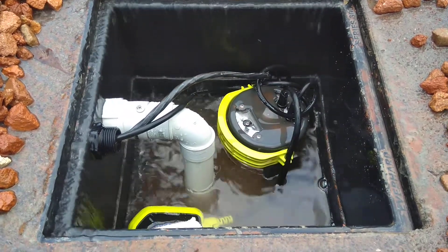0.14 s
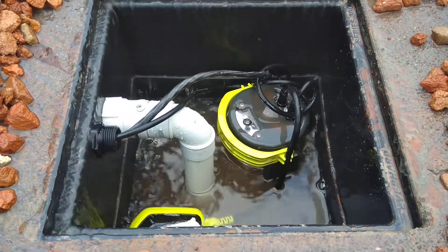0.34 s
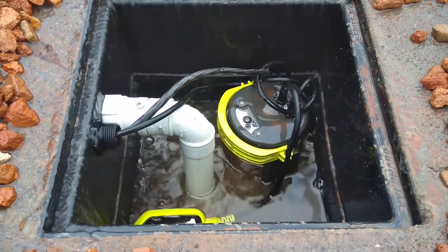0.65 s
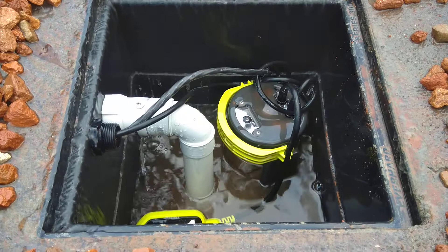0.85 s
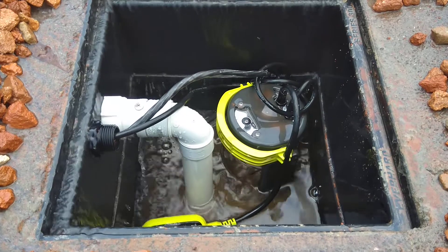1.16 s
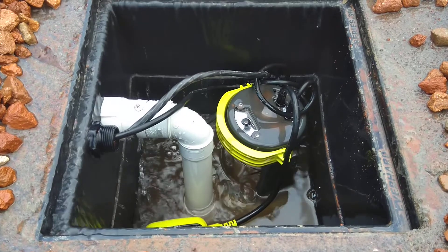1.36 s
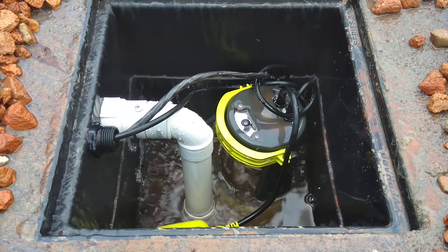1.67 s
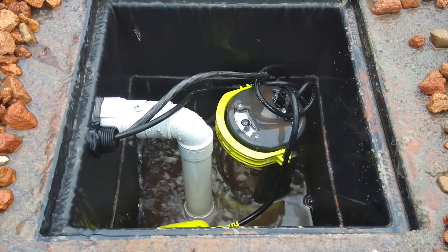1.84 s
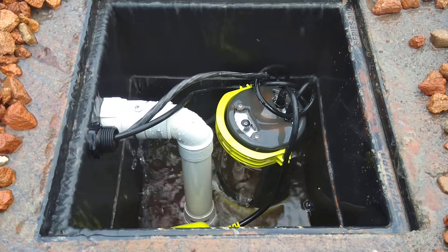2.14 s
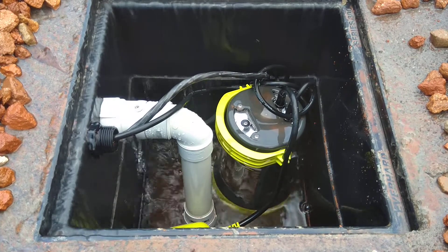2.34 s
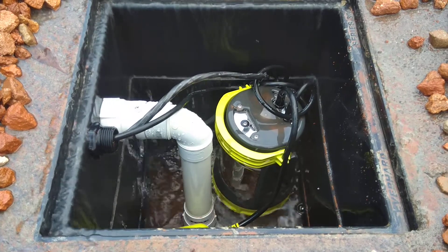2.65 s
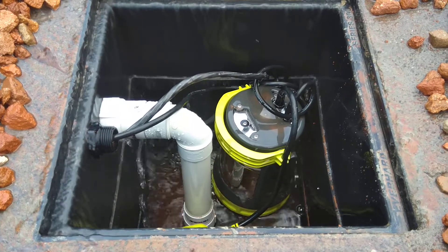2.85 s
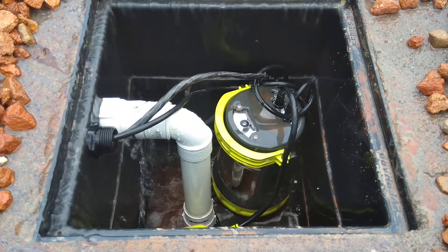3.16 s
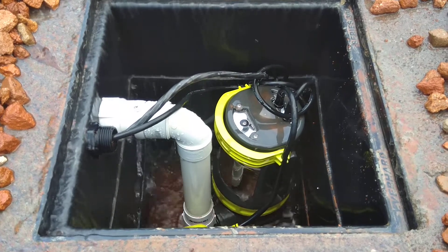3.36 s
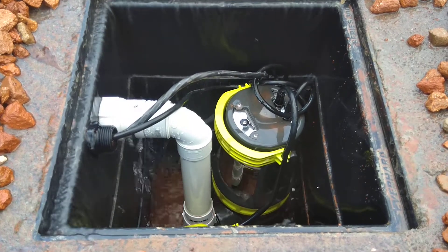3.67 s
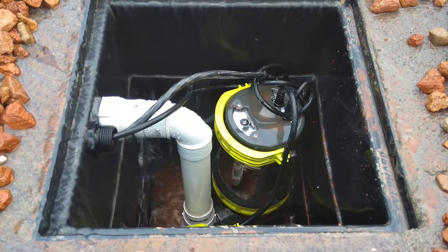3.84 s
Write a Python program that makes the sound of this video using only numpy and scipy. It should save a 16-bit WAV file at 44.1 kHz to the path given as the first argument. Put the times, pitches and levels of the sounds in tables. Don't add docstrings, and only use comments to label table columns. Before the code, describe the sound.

Heard from above by spaced stereo microphones, a pit pump's fluttering hum swells over turbulent water and spray, with small ringing drips and low gulps, until the hum breaks off in squeaky, slapping air suction.

```python
import sys
import numpy as np
from scipy import signal
from scipy.fft import rfft, irfft, next_fast_len
from scipy.io import wavfile

SR = 44100
rng = np.random.default_rng(int(sys.argv[2]) if len(sys.argv) > 2 else 0)


def bounce(signal):
    frames = np.transpose(np.atleast_2d(signal))
    limited = np.clip(frames, -1, 1)
    pcm = np.round(limited * 32767).astype(np.int16)
    wavfile.write(sys.argv[1], SR, pcm)


def voltage_ratio(decibels):
    exponent = np.asarray(decibels, float) / 20
    return 10 ** exponent


N = 176400
T = np.arange(N) / SR

# frequency [Hz], left minus right [dB].
BALANCE_DB = [(100, 0), (250, 1.7), (700, 4), (2000, 3), (4000, 2.4), (8000, 0)]
WATER_PAN_DB = 3.5


def rms_one(x):
    return x / np.sqrt(np.mean(x ** 2) + 1e-20)


def in_time(rows):
    return np.interp(T, *np.transpose(rows))


def at_hz(points, hz):
    curve_hz, value = np.transpose(points)
    return np.interp(np.log(hz), np.log(curve_hz), value)


def pan(db):
    return voltage_ratio(np.array([[db / 2], [-db / 2]]))


def butter2(x, hz, kind="low"):
    return signal.sosfilt(signal.butter(2, hz, kind, fs=SR, output="sos"), x)


def drift(rate_hz):
    r = np.exp(-80 * np.pi * rate_hz / SR)
    noise = rng.standard_normal(N // 40 + 2002)
    slow = signal.lfilter([1], [1, -2 * r, r * r], noise)[2000:]
    return np.interp(np.arange(N) / 40, np.arange(len(slow)), rms_one(slow))


def resonate(x, hz, width_hz):
    r = np.exp(-np.pi * width_hz / SR)
    poles = [1, -2 * r * np.cos(2 * np.pi * hz / SR), r * r]
    return signal.lfilter([1 - r * r, 0, r * r - 1], poles, x + 1e-18)


def spells(rows, rest_db):
    edge_s = .015
    gain = voltage_ratio(rest_db) + 0 * T
    for start, end, db0, db1 in rows:
        on = np.clip(np.minimum(T - start, end - T) / edge_s + .5, 0, 1)
        gain = gain + on * voltage_ratio(np.interp(T, [start, end], [db0, db1]))
    return gain


def bubbles(rows, rise, rough, attack_cycles):
    out = np.zeros((2, N + SR))
    noises = rng.standard_normal((len(rows), 4000))
    for (s, db, hz, cycles, pan_db), noise in zip(rows, noises):
        turn = np.arange(4000) / SR * hz
        swell = np.sin(np.pi / 2 * np.minimum(turn / attack_cycles, 1)) ** 2
        shape = swell * voltage_ratio(-60 * turn / cycles)
        splash = rms_one(resonate(resonate(noise, hz, .5 * hz), hz, .5 * hz))
        tone = np.sin(2 * np.pi * turn * (1 + rise * turn)) + rough * splash
        i = int(s * SR)
        out[:, i:i + 4000] += voltage_ratio(db) * shape * tone * pan(pan_db)
    return out[:, :N]


def bursts(times, levels_db, pan_db, t60_s, apart):
    out, age_s = np.zeros((2, N + SR)), np.arange(9000) / SR
    noises = rng.standard_normal((len(times), 2, 9000))
    for s, db, (mid, side) in zip(times, levels_db, noises):
        i = int(s * SR)
        puff = mid + apart * side * [[1], [-1]]
        out[:, i:i + 9000] += puff * voltage_ratio(db - 60 * age_s / t60_s) * pan(pan_db)
    return out[:, :N]


def rush(spectrum, low_hz, spray_db, count, shared_db, own_db):
    # frequency [Hz], left-right likeness [0..1].
    likeness = [(100, .998), (500, .98), (1000, .7), (2000, .25), (5000, .25), (10000, 0)]
    spray_hz, spray_octaves = 3500, .6
    out, together = 0, drift(25)
    edges = low_hz * 2 ** (np.arange(count + 1) / 3)
    white = rng.standard_normal((2, 2, N))
    for k, (low, high) in enumerate(zip(edges, edges[1:])):
        mid, side = butter2(white[k % 2], [low, high], "band")
        hz = np.sqrt(low * high)
        alike = np.clip(at_hz(likeness, hz), 0, 1)
        flicker_db = shared_db * together + own_db * drift(19.7)
        follow_db = spray_db * np.exp(-(np.log2(hz / spray_hz) / spray_octaves) ** 2)
        gain = voltage_ratio(at_hz(spectrum, hz) + flicker_db + follow_db) * pan(at_hz(BALANCE_DB, hz))
        out = out + gain * (np.sqrt(1 + alike) * mid + np.sqrt(1 - alike) * side * [[1], [-1]])
    return rms_one(out)


def rumble(churn_db, spray_db):
    # frequency [Hz], density [dB per Hz].
    spectrum = [(22, -22.5), (71, -12.5), (180, -1), (389, -16), (1000, -10), (1250, -15.5), (1750, -14.5),
                (2500, -29.5)]
    return voltage_ratio(-26 + 0.26 * churn_db) * rush(spectrum, 22.56, spray_db, count=20, shared_db=1.5, own_db=2.0)


def hiss(churn_db, spray_db):
    # frequency [Hz], density [dB per Hz].
    spectrum = [(2000, -3), (2410, -20), (2980, 1), (5010, 4.5), (6700, -1.5), (8200, -11), (13300, 2.5),
                (16000, -6.5)]
    return voltage_ratio(-30 + 0.21 * churn_db) * rush(spectrum, 2130, spray_db, count=9, shared_db=1.5, own_db=-1.73)


def fizz(per_s, low_hz, high_hz, cycles, spread_db, churn_db):
    sizes = voltage_ratio(spread_db * np.minimum(rng.exponential(1, N), 4)) * rng.choice([-1, 1], N)
    born = rng.random(N) < per_s * voltage_ratio(churn_db + 4 * drift(12)) / SR
    dealt, places_db = rng.integers(0, 30, N), rng.normal(0, 2.5, 30)
    out = 0
    for k, hz in enumerate(np.geomspace(low_hz, high_hz, 30)):
        ring = resonate(sizes * born * (dealt == k), hz, 3 * hz / cycles)
        ring = resonate(ring, hz, 6 * hz / cycles)
        out = out + pan(places_db[k] + at_hz(BALANCE_DB, hz)) * ring
    return rms_one(out)


def jets():
    # start [s], end [s], level at start [dB], at end [dB], centre at start [Hz], at end [Hz].
    jet_rows = [
        (.8, .88, -49, -33, 5120, 3800),
        (1.04, 1.09, -35, -49, 4390, 5010),
        (1.2, 1.28, -34, -36.5, 5000, 4660),
        (3.53, 3.6, -40, -33, 4400, 4000),
    ]
    table = np.array(jet_rows)
    centre_hz = np.interp(T, table[:, :2].ravel(), table[:, 4:].ravel())
    width_hz = 350
    sway = butter2(rng.standard_normal((2, N)), width_hz / 2)
    phase = 2 * np.pi * np.cumsum(centre_hz) / SR
    noise = rms_one(sway[0] * np.cos(phase) + sway[1] * np.sin(phase))
    return spells([row[:4] for row in jet_rows], -51) * noise * pan(9.6)


def ticks():
    # time [s], peak [dB], colour [Hz].
    tick_rows = [(0.0169, -13, 11900), (0.165, -18.5, 13100), (0.3124, -16, 7260), (0.6993, -18.5, 11600),
                 (0.9423, -15, 11500), (1, -21, 13200), (1.044, -18, 10700), (1.1517, -17, 10200),
                 (1.1904, -11, 14100), (1.2858, -21, 10300), (1.4032, -22.5, 10400), (1.5352, -15.5, 11000),
                 (1.5794, -11, 7850), (1.7835, -21, 10700), (1.809, -21, 12700), (1.8891, -31, 11900),
                 (2.2633, -19, 11300), (2.7273, -18, 12100), (3.0957, -17, 11100), (3.1647, -9.5, 7430),
                 (3.2961, -11, 6900)]
    t60_s, low_hz, level_db, broad_db = 0.0066, 5500, -3.5, 4.5
    out = np.zeros((2, N + SR))
    decay_db = -60 * np.arange(1500) / SR / t60_s
    noises = rng.standard_normal((len(tick_rows), 2, 1500))
    for (s, db, hz), noise in zip(tick_rows, noises):
        puff = rms_one(resonate(noise, hz, 0.1 * hz)) + voltage_ratio(broad_db) * noise
        i = int(s * SR)
        out[:, i:i + 1500] += puff * voltage_ratio(db + level_db + decay_db)
    return butter2(out[:, :N], low_hz, "high")


def drips():
    # time [s], peak before level_db [dB], pitch [Hz], left minus right before side_db [dB].
    drip_rows = [(0.0417, -20.5, 2350, -8), (0.0667, -20, 5030, 4), (0.2141, -20.5, 6100, 6),
                 (0.3107, 0.5, 5220, -4), (0.7905, -14, 5380, -5), (0.836, -24, 4500, -1),
                 (0.9418, -17, 4370, 0), (0.9994, -14, 5980, 8.5), (1.0268, -18, 5560, 9),
                 (1.045, -16, 4360, 0), (1.0974, -20.5, 5420, 4.5), (1.283, -19, 2375, -3),
                 (1.37, -19, 4170, 2.0), (1.402, -20, 4660, -4), (1.6122, -11, 3970, 2.5),
                 (1.925, -17, 2800, 0), (1.9404, -14, 4860, -5), (2.0255, -23, 4680, 4.0),
                 (2.2632, -6.5, 4210, 1), (2.293, -23, 4020, 8.5), (2.318, -21, 4600, 5.5),
                 (2.38, -18.5, 4150, 6), (2.4643, -25, 4530, 12), (2.5676, -16.5, 4510, 4.0),
                 (2.6618, -20.5, 4300, 7), (2.9696, -19, 4700, -8), (3.1616, -6.5, 5440, -8),
                 (3.2001, -17, 4700, 0), (3.247, -19, 3140, -1), (3.2941, -4.5, 5480, -8),
                 (3.5071, -19.5, 2350, -2), (3.5314, -19, 4260, 0)]
    level_db, cycles, side_db = -1.8, 86, 18
    rows = [(s, db + level_db, hz, cycles, side_db + pan_db) for s, db, hz, pan_db in drip_rows]
    return bubbles(rows, rise=.0006, rough=0.47, attack_cycles=11.7)


def gulps():
    # time [s], peak [dB], pitch [Hz], length [cycles].
    gulp_rows = [(0.618, -12, 1200, 34), (.756, -12, 647, 15), (0.764, -5.5, 1680, 14),
                 (.865, -11.5, 685, 34), (1.396, -13.5, 640, 23), (1.405, -22, 1510, 40),
                 (1.41, -16.5, 1010, 30), (1.484, -7, 278, 36), (1.486, -8.5, 490, 26),
                 (1.498, -17, 258, 7.4), (1.503, -17, 670, 34), (1.493, -23, 900, 42),
                 (1.8, -10.5, 704, 17), (1.987, -15.5, 550, 33), (2.171, -5, 483, 50), (2.2, -5.5, 646, 15),
                 (2.265, 1.5, 680, 18), (2.266, -13, 1570, 17), (2.266, -7, 247, 14),
                 (2.265, -2.5, 5400, 34), (2.978, -10, 1510, 32), (2.979, -2.5, 797, 9.2),
                 (3.7785, -5.5, 502, 19), (3.779, -8, 805, 18), (3.784, -14, 1220, 35),
                 (3.794, -14, 515, 60), (3.8, -24, 1570, 35), (3.821, -12.5, 914, 49),
                 (3.911, -13, 720, 22), (3.918, -4, 940, 11), (3.921, -7, 297, 9.8), (3.956, -5.5, 604, 9),
                 (3.969, -11, 450, 27), (3.976, -25, 1190, 9.7), (3.981, -5, 670, 12),
                 (3.987, -12, 774, 18)]
    rings = bubbles([(*row, WATER_PAN_DB) for row in gulp_rows], rise=.004, rough=.55, attack_cycles=2.1)
    s, db = np.transpose(gulp_rows)[:2]
    wash = bursts(s, db - 10.5, 4.9, t60_s=0.17, apart=1.0)
    return rings + butter2(wash, [300, 1630], "band")


def slurp():
    # time [s], level [dB].
    puffs = [
        (3.877, -7),
        (3.901, -12),
        (3.914, -5.5),
        (3.962, 1),
        (3.969, 0.5),
        (3.975, -26),
        (3.994, -4),
    ]
    # resonance [Hz], width [Hz], level [dB].
    modes = [(1050, 380, -4.5), (2433, 47, -7.5), (3720, 450, -22), (5030, 670, -19)]
    s, db = np.transpose(puffs)
    puff = bursts(s, db, 2.2, t60_s=.04, apart=1.0)
    return sum(voltage_ratio(mode_db) * resonate(puff, hz, width_hz) for hz, width_hz, mode_db in modes)


def squeaks():
    # time [s], peak [dB], pitch [Hz], length [cycles].
    squeak_rows = [(2.259, -9.5, 3250, 97), (3.8763, -7, 3630, 32), (3.888, -17, 4700, 110),
                   (3.9, -10.5, 4530, 190), (3.903, -12, 3700, 200), (3.91, -16, 4500, 290),
                   (3.911, -25, 5500, 100), (3.912, -20, 2450, 210), (3.961, -12.5, 5070, 180),
                   (3.961, -21, 6200, 120), (3.967, -14, 5360, 80), (3.972, -12, 5260, 110),
                   (3.995, -15, 6400, 110)]
    return bubbles([(*row, WATER_PAN_DB) for row in squeak_rows], rise=0, rough=0.11, attack_cycles=2.8)


def slaps():
    # time [s], peak [dB], pitch [Hz], length [cycles].
    slap_rows = [
        (3.878, 0, 960, 13),
        (3.9008, 0, 900, 12),
        (3.9612, -3, 1000, 11),
    ]
    s, db = np.transpose(slap_rows)[:2]
    crack = butter2(bursts(s, db - 5, WATER_PAN_DB, t60_s=.012, apart=.6), 4500)
    thud = bubbles([(*row, WATER_PAN_DB) for row in slap_rows], rise=0, rough=.25, attack_cycles=.6)
    return crack + thud


def motor():
    # start [s], end [s], level at start [dB], at end [dB].
    hum_spells = [
        (0, .24, -29, -52),
        (.28, .7, -26, -25.5),
        (.76, 1.36, -21, -23.5),
        (1.4, 1.54, -23, -34),
        (1.73, 2.52, -22, -24.5),
        (2.58, 3.1, -17.5, -13.5),
        (3.1, 3.88, -11.5, -13),
    ]
    half_spells = [
        (0, .25, -27.5, -55),
        (.33, .66, -27, -47),
        (1.04, 1.3, -29.5, -33),
        (1.54, 1.9, -23.5, -34.5),
        (2.1, 2.33, -30.5, -24.5),
        (2.37, 2.5, -27.5, -30),
        (2.55, 4.1, -42, -33.5),
    ]
    # frequency [Hz], level [dB], flutter [dB].
    steady_tones = [(100, -39, 1.5), (300, -39, 2)]
    blade_hz, column_hz, column_width_hz, column_db = 171.1, 202.7, 29, -31
    hum = spells(hum_spells, -34.5)
    phase = 2 * np.pi * blade_hz * T
    blade = (1 + .16 * drift(23.2)) * np.sin(phase + .25 * drift(10))
    half = (1 + 0.036 * drift(30)) * np.sin(phase / 2 + 0.87 * drift(8.3))
    tones = 0
    for hz, db, flutter_db in steady_tones:
        gain = voltage_ratio(db + flutter_db * drift(1.9))
        tones = tones + gain * np.sin(2 * np.pi * hz * T + 0.13 * drift(2.4))
    column = resonate(rng.standard_normal(N), column_hz, column_width_hz)
    column = rms_one(resonate(column, column_hz, column_width_hz))
    shaken = voltage_ratio(column_db) * (hum / hum.mean()) ** 0.44
    return hum * blade + spells(half_spells, -46.5) * half + tones + shaken * column


def scene():
    # time [s], level [dB].
    churn_curve = [
        (0, -34.5),
        (.81, -35),
        (1.7, -30.5),
        (2.25, -27),
        (2.6, -29),
        (3.6, -27.5),
        (4, -23),
    ]
    spray_curve = [(0, -39.5), (.28, -43.5), (.33, -44.5), (.64, -46.5), (.8, -41.5), (1.15, -44),
                   (1.4, -43), (1.95, -44.5), (2.1, -47), (2.25, -41.5), (3, -37), (4, -35.5)]
    churn_db, spray_db = [in_time(c) - in_time(c).mean() for c in (churn_curve, spray_curve)]
    duck = voltage_ratio(-10 * np.clip((T - 3.885) / 0.0053, 0, 1))
    still_db = 0 * T
    fizzing = (voltage_ratio(-33 + churn_db) * fizz(450, 380, 1450, 18, 3.0, churn_db)
               + voltage_ratio(-41 + spray_db) * fizz(500, 2300, 6500, 45, 3.2, still_db)
               + voltage_ratio(-43) * duck * fizz(600, 8500, 15000, 14, 5, still_db))
    splashes = jets() + ticks() + drips() + gulps() + slurp() + squeaks() + slaps()
    water = butter2(fizzing + splashes, 150, "high")
    turbulence = rumble(churn_db, spray_db) + duck * hiss(churn_db, spray_db)
    return turbulence + water + motor() * pan(0.32)


def band_limit(x):
    return signal.sosfilt(signal.butter(12, 16840, fs=SR, output="sos"), x)


def record(dry):
    # frequency [Hz], lead of the left microphone [s].
    left_leads = [(500, .0002), (1100, .00026), (2000, .00038)]
    size = next_fast_len(N + 100)
    hz = np.arange(size // 2 + 1) / size * SR + 1e-3
    delay = np.exp(-2j * np.pi * hz * at_hz(left_leads, hz))
    right = irfft(rfft(dry[1], size) * delay, size)[:N]
    limited = np.tanh(np.array([dry[0], right]))
    top_cut = signal.cheby2(12, 60, 16150, fs=SR, output="sos")
    return band_limit(signal.sosfilt(top_cut, limited))


dry = scene()
out = record(dry)
bounce(out)
```